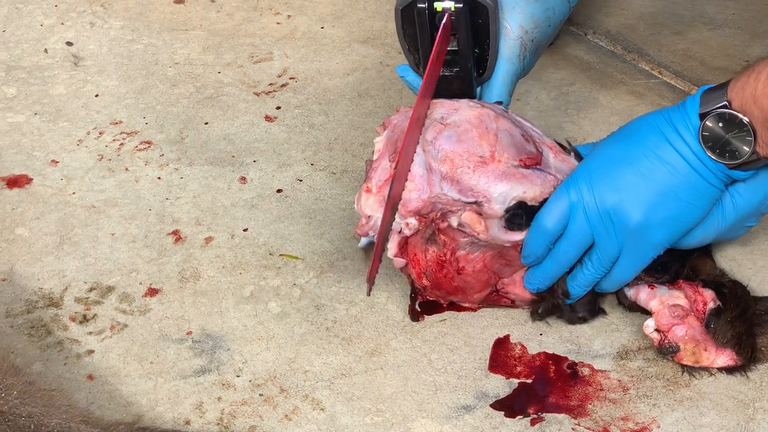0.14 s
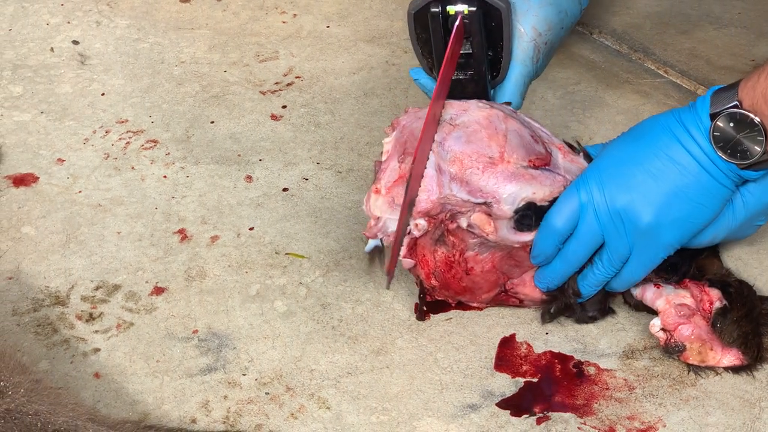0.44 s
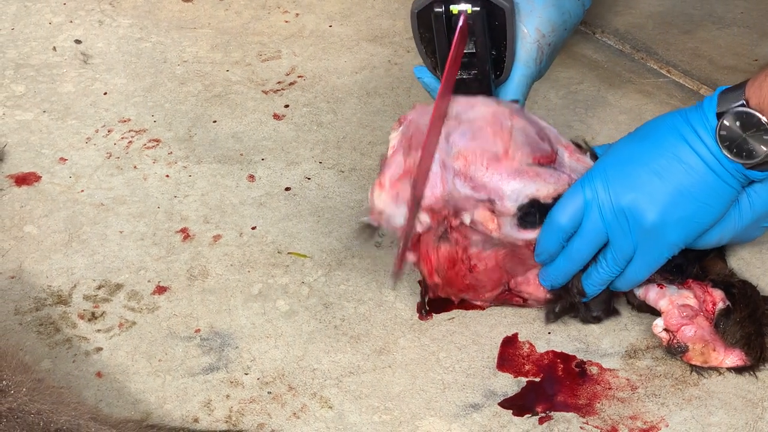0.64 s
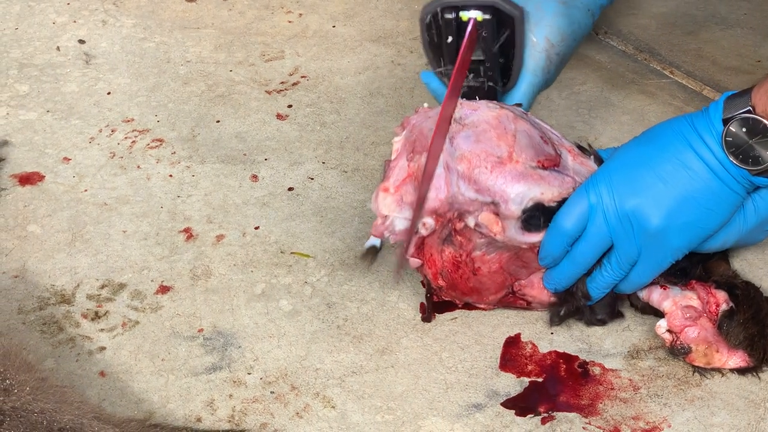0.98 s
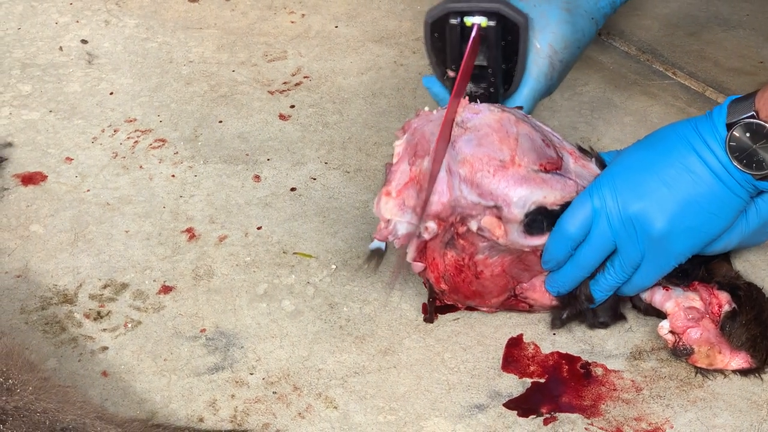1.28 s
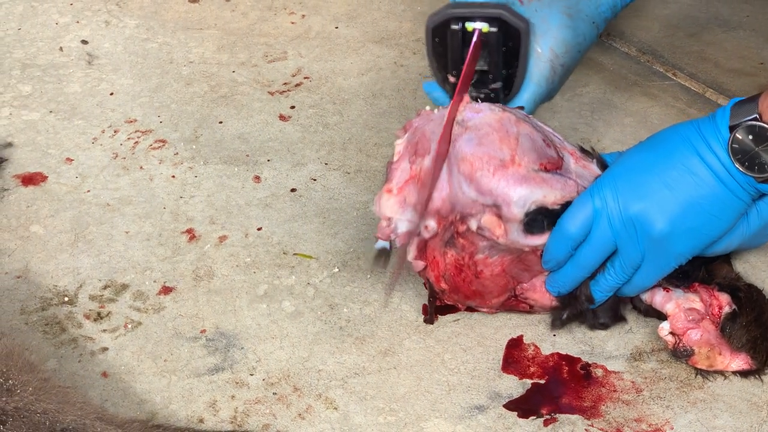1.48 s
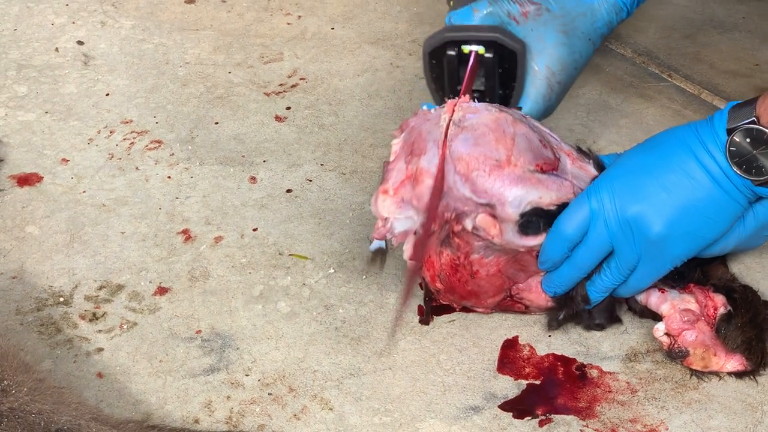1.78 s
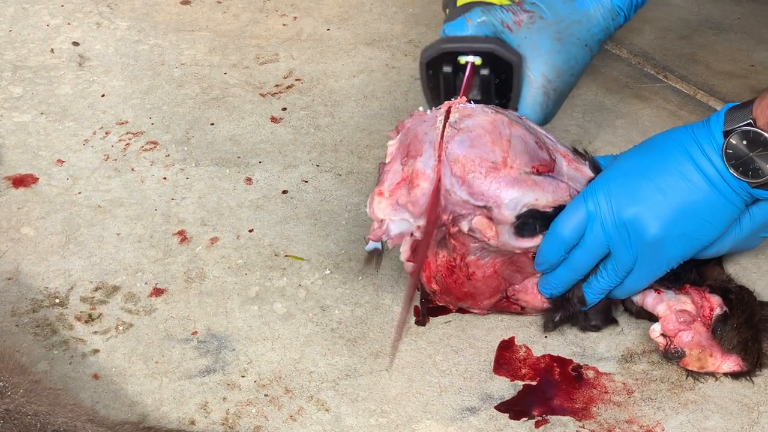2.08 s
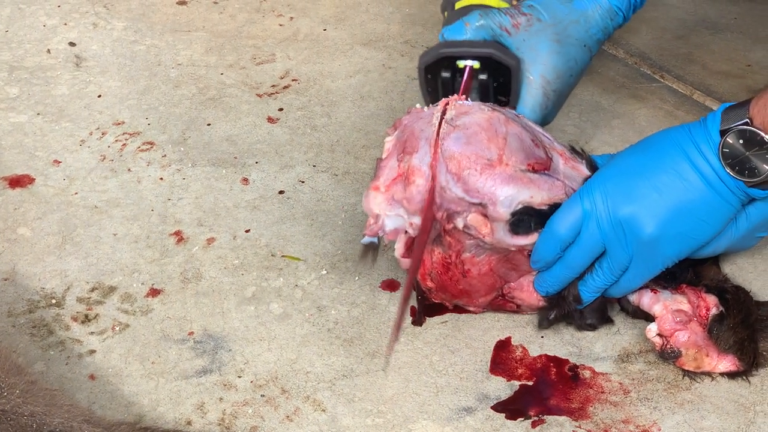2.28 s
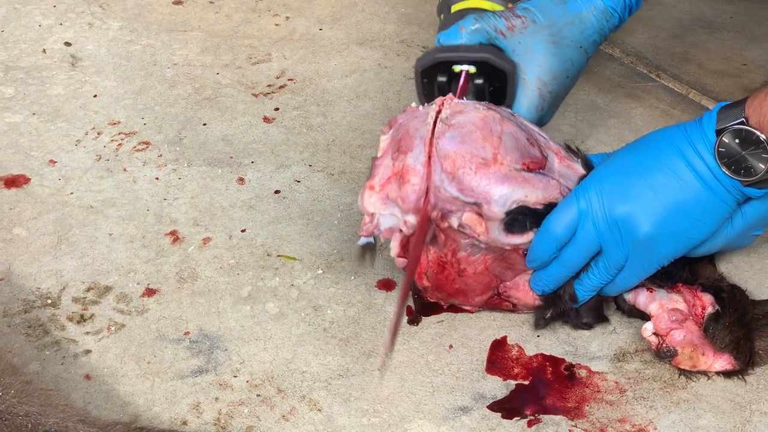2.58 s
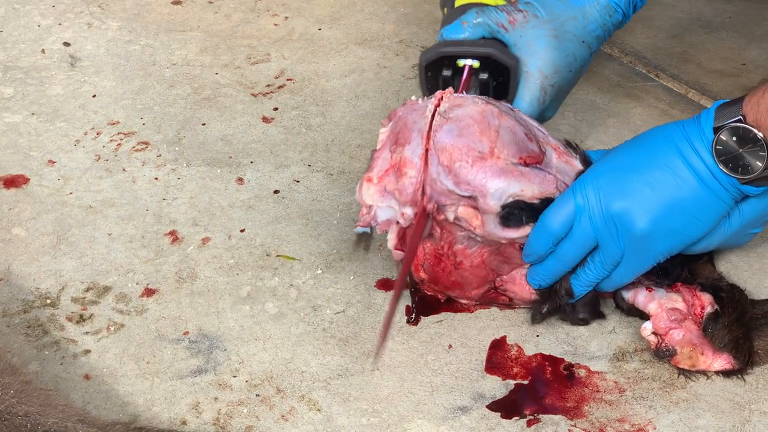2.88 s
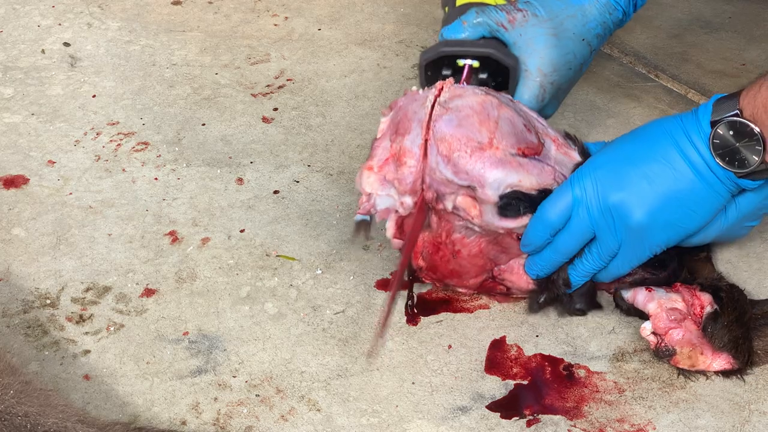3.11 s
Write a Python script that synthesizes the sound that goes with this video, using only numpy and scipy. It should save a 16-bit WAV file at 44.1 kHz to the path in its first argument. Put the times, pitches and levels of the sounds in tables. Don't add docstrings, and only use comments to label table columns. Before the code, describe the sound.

A battery reciprocating saw clicks, spins up, then rasps loudly and steadily through bone.

```python
import sys
import numpy as np
from scipy import signal
from scipy.fft import rfft, irfft, next_fast_len
from scipy.io import wavfile

SR = 44100
rng = np.random.default_rng(int(sys.argv[2]) if len(sys.argv) > 2 else 0)


def to_wav(sig):
    pcm = np.clip(np.atleast_2d(sig), -1, 1) * 32767
    pcm = np.round(pcm).astype(np.int16)
    wavfile.write(sys.argv[1], SR, pcm.T)


def boost(x):
    u = np.asarray(x, float) / 20
    return 10 ** u


N = 143325


def evened(x):
    return x / np.sqrt(np.mean(x ** 2) + 1e-20)


def read(points, hz):
    f, value = np.transpose(points)
    return np.interp(np.log(hz + 1), np.log(f + 1), value)


def along(table, column=1):
    return np.interp(np.arange(N) / SR, np.array(table)[:, 0], np.array(table)[:, column])


def colour(x, points):
    return irfft(rfft(x) * boost(read(points, np.fft.rfftfreq(N, 1 / SR))), N)


def drift(hz):
    lowpass = 1 + (np.fft.rfftfreq(N, 1 / SR) / hz) ** 2
    return evened(irfft(rfft(rng.standard_normal(N)) / lowpass, N))


def turning(hz):
    return 2 * np.pi * np.cumsum(hz) / SR


def add(mix, s, sound):
    part = mix[max(round(s * SR), 0):][:len(sound)]
    part += sound[:len(part)]


# time in seconds, blade load in dB, motor air relative to load in dB
SAW_LOAD = [(0, -43.5, 2.5), (.05, -51.5, -10), (.23, -74, -7), (.52, -76, -17), (.54, -47.5, -19),
            (.65, -45.5, -15), (.69, -27, -13), (.75, -22, -3), (1.0, -22.5, -1), (1.27, -24.5, -1.2),
            (1.33, -27, -1.5), (1.6, -24.5, -4.5), (1.7, -26.5, -4.5), (2.42, -28, -2.5), (2.46, -25, -6.5),
            (2.82, -25.5, -5.5), (2.87, -27.5, -4), (3.25, -27, -3)]
# time in seconds, share of full speed [0-1]
MOTOR_SPEED = [(0, .11), (.53, .08), (.648, .075), (.695, .4), (.742, .76), (.77, .9), (.81, .97),
               (.9, 1.012), (1.13, .995), (1.43, .995), (1.65, .98), (2.08, 1.002), (2.4, .982),
               (3.0, .985), (3.25, .972)]
# multiple of the stroke rate, bone depth in dB, air depth in dB
STROKE_THROB = [(1, 0.5, 1.5), (2, 0.5, 2), (4, 0.5, 0.5), (6, .8, 1)]
STROKE_HZ = 49.5


def saw():
    speed, load = along(MOTOR_SPEED), boost(along(SAW_LOAD))
    stroke = turning(STROKE_HZ * speed * (1 + 0.0019 * drift(1.95)))
    rasp = boost(3.5) * evened(bone_rasp(throb(stroke, 1)))
    hiss = boost(along(SAW_LOAD, column=2) + 3.0) * evened(motor_air(throb(stroke, 2)))
    running = load / boost(-27) * speed ** 2
    tones = stroke_hum(stroke) + shaft_tone(speed) + gear_whine(speed)
    return load * (rasp + hiss) + running * np.sqrt(2) * tones


def throb(stroke, column):
    swing = np.zeros(N)
    for row in STROKE_THROB:
        depth_db = row[column] * (1 + 0.25 * drift(11))
        swing += depth_db * np.cos(row[0] * stroke + rng.uniform(0, 5.9))
    return swing


def grit(spread_db):
    hits_per_s = 3500
    sizes = boost(spread_db * np.minimum(rng.exponential(1, N), 4))
    hits = (rng.random(N) < hits_per_s / SR) * sizes
    return evened(evened(hits * rng.standard_normal(N)) + 0.98 * rng.standard_normal(N))


# frequency in Hz, level in dB
BONE_COLOUR = [(250, -52), (450, -6), (750, -6.5), (1300, 0), (2100, -11), (3500, -7.5), (6000, -8.5),
               (9000, -17.5)]
# frequency in Hz, width in Hz, level in dB
BODY_RINGS = [(499, 62, -4), (1067, 73, -9), (1180, 29, -16.5), (1340, 35, -4), (1685, 130, -3.5),
              (2296, 380, -6.5), (2770, 340, -8), (4590, 490, -13), (6360, 140, -22)]


def bone_rasp(swing_db):
    chatter_db, chatter_hz, rings_db = 2.5, 25, -3
    teeth = grit(1.5) * boost(swing_db + 0.72 * drift(24))
    spectrum, hz = rfft(teeth), np.fft.rfftfreq(N, 1 / SR)
    rings = np.zeros(N)
    for f, width, db in BODY_RINGS:
        mode = irfft(spectrum / (1 + 2j * (hz - f) / width), N)
        rings += boost(db + chatter_db * drift(chatter_hz)) * mode
    return contact() * (colour(teeth, BONE_COLOUR) + boost(rings_db) * rings)


# frequency in Hz, level in dB
AIR_COLOUR = [(4000, -60), (7400, -1), (8300, 2.5), (9800, -1), (11500, -3), (12800, -3), (15400, -9),
              (16000, -40)]


def motor_air(swing_db):
    return colour(grit(0.94) * boost(swing_db + drift(28)), AIR_COLOUR)


# multiple of the stroke rate, level in dB
HUM_ORDERS = [(1, -18), (2, -12.5), (3, -6.5), (4, -18), (5, -6), (6, -55), (7, -13.5), (8, -8.5), (9, -3),
              (10, 0), (11, 1), (12, -7.5)]


def stroke_hum(stroke):
    hum_db, hum = -43.5, np.zeros(N)
    for order, db in HUM_ORDERS:
        level = boost(hum_db + db + 1.54 * drift(12))
        hum += level * np.cos(order * stroke + rng.uniform(0, 5.66))
    return hum


# time in seconds, level in dB
GRIP_FADE = [(.8, -0.5), (1.2, -0.4), (2.08, -4), (2.15, -9), (2.3, -7), (3.25, -5)]


def shaft_tone(speed):
    shaft_hz, shaft_db = 364, -38
    level = boost(shaft_db + along(GRIP_FADE) + 2 * drift(3.1))
    return level * np.cos(turning(shaft_hz * speed * (1 + 0.001 * drift(6))))


# time in seconds, boost in dB
GEAR_SURGE = [(.72, 0), (.742, 15), (.8, 9), (.83, 0)]


def gear_whine(speed):
    mesh_hz, mesh_db = 2883, -40
    level = boost(mesh_db + along(GEAR_SURGE) + 3.55 * drift(21))
    return level * np.cos(turning(mesh_hz * speed * (1 + 0.01986 * drift(19.85))))


# start in seconds, level in dB, ring in Hz
SKULL_SLAPS = [(0.7058, -21, 1220), (0.7251, -19, 1080), (0.7514, -12, 1340), (0.8156, -14, 1370),
               (0.8343, -10, 1700), (0.885, -11, 1130), (0.935, -14, 1210), (0.953, -11, 1610),
               (0.99, -17, 1100), (1.0444, -19, 1320), (1.1053, -15, 1350), (1.127, -11, 1380),
               (1.1874, -6, 1330), (1.2262, -17, 1310), (1.2681, -16, 1350), (1.3817, -10, 1330),
               (1.4704, -18, 1340), (1.5532, -13, 1110), (1.6293, -20, 1330), (1.6572, -20, 1400),
               (1.7789, -17, 1370), (1.7999, -17, 1340), (1.861, -20, 1340), (1.947, -19, 1060),
               (1.9617, -9, 1340), (2.0997, -24, 1320), (2.1425, -12, 1290), (2.2169, -22, 1270),
               (2.2638, -12, 1250), (2.4475, -20, 1340), (2.5153, -19, 1330), (2.5716, -16, 1390),
               (2.5931, -16, 1330), (2.6335, -18, 1210), (2.655, -19, 1180), (2.675, -16, 1410),
               (2.6954, -15, 1400), (2.7163, -21, 1180), (2.7554, -22, 1260), (2.8136, -23, 1360),
               (2.8794, -17, 1340), (2.9099, -20, 1050), (2.961, -20, 1390), (3.068, -19, 1700),
               (3.105, -16, 1220)]
# start in seconds, level in dB, ring in Hz
TOOTH_SNAGS = [(0.7417, -18, 2250), (0.7844, -15, 2710), (0.924, -17, 2670), (1.1523, -17, 2850),
               (1.3294, -18, 2900), (1.5753, -14, 2250), (1.594, -16, 2860), (1.6377, -13, 2230),
               (2.3965, -17, 2830), (2.7048, -15, 2830), (2.7916, -17, 2870), (3.0011, -15, 2870),
               (3.2071, -23, 2780)]


def slaps():
    out, t = np.zeros(N), np.arange(2000) / SR
    for table, gain_db, t60 in ((SKULL_SLAPS, -3, 0.028), (TOOTH_SNAGS, -2.5, 0.04)):
        for s, db, hz in table:
            ring = boost(-60 * t / t60) * np.sin(2 * np.pi * hz * t)
            crack = 0.3 * boost(-60 * t / 0.0091) * rng.standard_normal(len(t))
            add(out, s, boost(db + gain_db) * np.minimum(t / 0.0015, 1) * (ring + crack))
    return out


def contact():
    lift, lift_s, lead_s = 0.43, 0.0026, 0.004
    marks, u = np.zeros(N), np.linspace(-3, 3, round(6 * lift_s * SR))
    marks[((np.array(SKULL_SLAPS)[:, 0] - lead_s) * SR).astype(int)] = 1
    return np.clip(1 - lift * signal.oaconvolve(marks, np.exp(-u ** 2), "same"), 0, 1)


def controller():
    chop_hz, sideband_hz, chop_db = 9990, 1750, -48
    start_s, end_s, tail_db, tail_t60 = 0.529, 0.735, -5, 0.4
    t, speed = np.arange(N) / SR, along(MOTOR_SPEED)
    on = np.clip((t - start_s) / 0.004, 0, 1) * np.clip((end_s - t) / 0.04, 0, 1)
    on = on + boost(tail_db - 60 * t / tail_t60)
    carrier = np.cos(2 * np.pi * chop_hz * t + 0.4 * drift(150))
    tone = carrier * (0.4 + 2 * np.cos(turning(sideband_hz * speed)))
    return boost(chop_db + 20 * np.minimum(speed, 0.5) + 1.5 * drift(60)) * on * tone


# start in seconds, level in dB, case ring in dB
TRIGGER_CLICKS = [
    (.011, -22, 0),
    (.534, -22, -2),
    (0.571, -29, 1.5),
    (0.666, -14, -19),
]
# frequency in Hz, level in dB, t60 in seconds
CASE_MODES = [(1116, 3.5, 0.057), (1330, -1.5, 0.027), (1700, -1, 0.036), (3200, -35, .02),
              (8200, -3, 0.018), (12700, -10, 0.02)]


def trigger():
    out, t = np.zeros(N), np.arange(5000) / SR
    for s, db, ring_db in TRIGGER_CLICKS:
        ring = np.zeros(len(t))
        for f, mode_db, t60 in CASE_MODES:
            shade_db = 2 * rng.standard_normal()
            ring += boost(mode_db + shade_db - 60 * t / t60) * np.sin(2 * np.pi * f * t)
        scrape = np.minimum(t / 0.0025, 1) * boost(-60 * t / 0.04) * rng.standard_normal(len(t))
        rung = signal.fftconvolve(ring, scrape / np.linalg.norm(scrape))[:len(t)]
        add(out, s, boost(db - 6.5) * (boost(ring_db) * rung + 0.6 * scrape))
    return out


# centre in seconds, level in dB, pitch in Hz
MIC_PUFFS = [(0.028, -20, 130), (.038, -21, 240), (0.081, -25, 380), (0.084, -21.5, 148), (.145, -36, 350),
             (.188, -20, 186), (.201, -13, 91.4), (0.238, -28, 74), (.255, -38.5, 300), (0.383, -34, 92),
             (.45, -29, 139), (.55, -27.5, 70), (0.621, -27, 72), (0.676, -17.5, 82), (0.69, -19, 330),
             (0.702, -19, 87), (0.725, -13.5, 95), (0.771, -7.5, 137), (0.782, -19, 86), (.823, -17, 113),
             (0.919, -21.5, 80), (1.011, -27, 125), (1.122, -26.5, 143), (1.237, -29, 63.7),
             (1.713, -30, 94), (1.797, -22, 188), (1.852, -27.5, 87), (1.92, -32, 62), (2.481, -30, 132),
             (2.784, -26.5, 85.5), (2.812, -24, 92), (3.001, -28.5, 203), (3.036, -32, 80)]


def puffs():
    puff_cycles, pitch_drop, puff_db, spit_db = 2.346, 0.71, 0.5, -18.5
    out = np.zeros(N)
    edge = signal.butter(3, [170, 400], "band", fs=SR, output="sos")
    spit = boost(spit_db) * evened(signal.sosfilt(edge, rng.standard_normal(N)))
    for s, db, hz in MIC_PUFFS:
        u = np.arange(0, 1, hz / (puff_cycles * SR))
        cycles = puff_cycles * ((1 + pitch_drop) * u - pitch_drop * u ** 2)
        wave = np.cos(2 * np.pi * (cycles + rng.random())) + (1 - u) * spit[round(s * SR):][:len(u)]
        swell = np.sin(np.pi * u ** 0.74) ** 2
        add(out, s - len(u) / SR * 0.5 ** (1 / 0.722), boost(db + puff_db) * swell * wave)
    return out


# time in seconds, level in dB
DRAUGHT_LEVEL = [(0, -29), (.1, -31.5), (.33, -42), (.5, -39), (.65, -35.5), (.8, -24), (.87, -41),
                 (1.25, -40.5), (1.45, -51.5), (1.95, -47), (2.1, -58), (2.43, -50), (2.58, -42),
                 (2.68, -40.5), (2.8, -30.5), (2.87, -47.5), (3.03, -40), (3.25, -52)]
# frequency in Hz, level in dB
RUMBLE_COLOUR = [(20, -61), (45, 3), (90, -1), (180, -10.5), (350, -16), (700, -32.5), (1500, -33.5),
                 (3000, -82)]


def draught():
    level = boost(along(DRAUGHT_LEVEL) + 1.5 + 2.5 * drift(26))
    return level * evened(colour(rng.standard_normal(N), RUMBLE_COLOUR))


# frequency in Hz, level in dB
HUSH_COLOUR = [(180, -68), (300, -34), (376, -10), (434, -17), (1680, -16.5), (1850, -20), (2590, -23.5),
               (14000, -54)]


def barn_hush():
    hush = [evened(colour(rng.standard_normal(N), HUSH_COLOUR)) for _ in range(2)]
    return boost(-57 + 2.5) * np.array(hush)


# frequency in Hz, lead in radians
PORT_LEAD = [(0, 0), (2600, .5), (5400, 3.14), (6000, 6.5), (7200, 9.42), (8200, 10.2), (11850, 3.14),
             (14800, -3.14)]
# frequency in Hz, direct share of power [0-1]
DIRECT_SHARE = [(250, 0.95), (650, 0.41), (1200, 0.9), (2100, 0.17), (2800, 0.64), (3800, 0.3),
                (6400, 0.77), (12000, 0.82)]
# frequency in Hz, left minus right in dB
PORT_TILT = [(300, -4), (800, -1.5), (4300, 0.5), (4700, 0), (6300, -2.5), (7600, -1), (8400, -12.5),
             (9500, 0.8)]


def ports(x):
    barn_t60, sway_hz = 0.38, 2.4
    size = next_fast_len(N + SR)
    hz, t = np.fft.rfftfreq(size, 1 / SR), np.arange(SR // 2) / SR
    tail = rng.standard_normal((3, 2, len(t))) * boost(-60 * t / barn_t60) * np.minimum(t / 0.0013, 1)
    tail = tail / np.linalg.norm(tail, axis=2, keepdims=True)
    turns = sway_hz * np.arange(N) / SR + np.arange(3)[:, None] / 3
    sway = np.sqrt(2 / 3) * np.cos(2 * np.pi * turns)
    echo = (rfft(tail, size) * rfft(x * sway, size)[:, None]).sum(0)
    share, side = np.clip(read(DIRECT_SHARE, hz), 0, 1), np.array([[0.5], [-0.5]])
    direct = rfft(x, size) * np.exp(1j * side * np.interp(hz, *np.transpose(PORT_LEAD)))
    heard = np.sqrt(share) * direct + np.sqrt(1 - share) * echo
    return irfft(boost(side * read(PORT_TILT, hz)) * heard, size)[:, :N]


def notched(x, nulls):
    hz = np.fft.rfftfreq(N, 1 / SR)
    cut_db = sum(db * np.exp(-(2 * (hz - f) / width) ** 4) for f, width, db in nulls)
    cut = irfft(rfft(x) * boost(cut_db), N)
    leak = np.minimum(boost(-14 + 5 * drift(3)), 1)
    return cut + leak * (x - cut)


def scene():
    return ports(saw() + slaps() + controller() + trigger()) + puffs() + draught() + barn_hush()


def top_cut(x):
    return signal.sosfilt(signal.butter(12, 15800, fs=SR, output="sos"), x)


# frequency in Hz, width in Hz, depth in dB
SUM_NULLS = [(5400, 250, -5), (7250, 500, -16), (11850, 600, -28), (14950, 600, -25), (15600, 500, -3),
             (16600, 1400, -60)]
# frequency in Hz, width in Hz, depth in dB
DIFFERENCE_NULLS = [(6100, 300, -5), (10250, 450, -12), (13400, 500, -25)]


def record(dry):
    ceiling, mono_hz = 1.2, 286
    left, right = ceiling * np.tanh(dry / ceiling)
    mid = notched((left + right) / 2, SUM_NULLS)
    side = notched((left - right) / 2, DIFFERENCE_NULLS)
    side = signal.sosfiltfilt(signal.butter(6, mono_hz, "high", fs=SR, output="sos"), side)
    return top_cut(np.array([mid + side, mid - side]))


dry = scene()
out = record(dry)
to_wav(out)
```